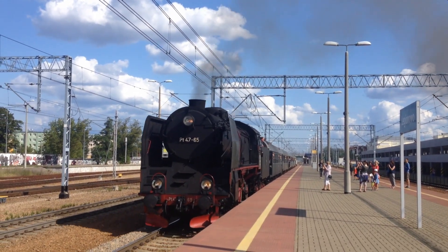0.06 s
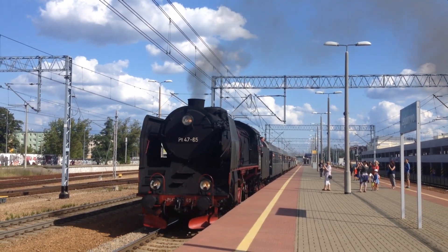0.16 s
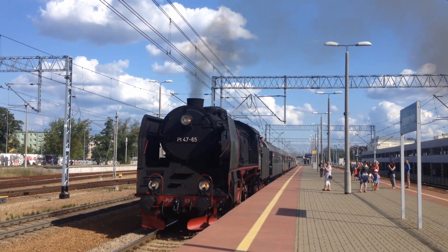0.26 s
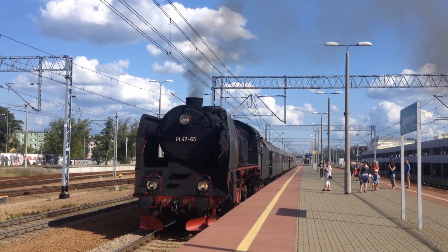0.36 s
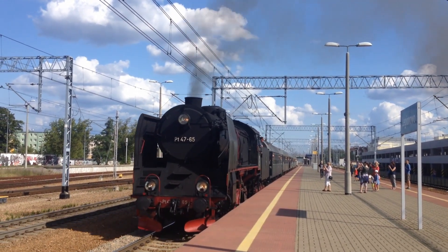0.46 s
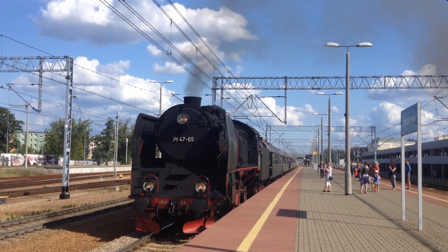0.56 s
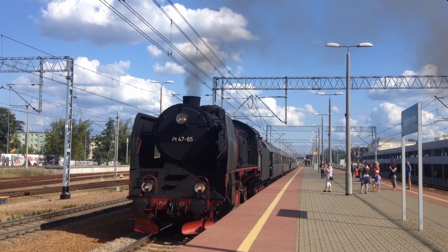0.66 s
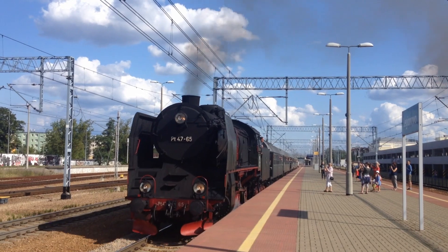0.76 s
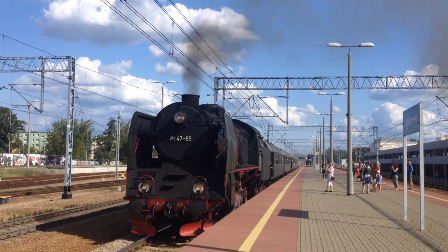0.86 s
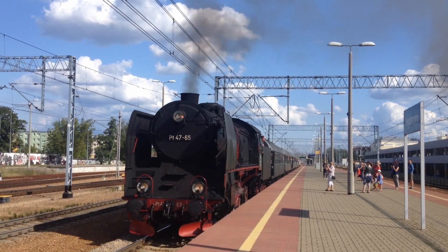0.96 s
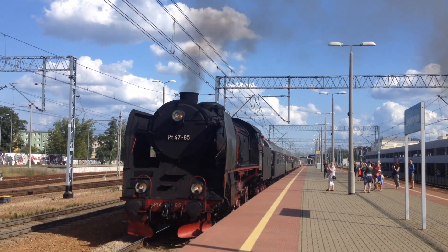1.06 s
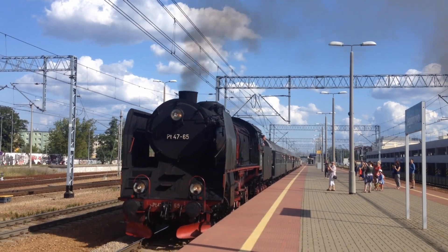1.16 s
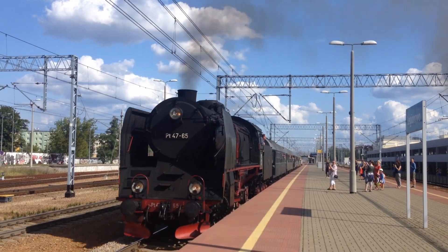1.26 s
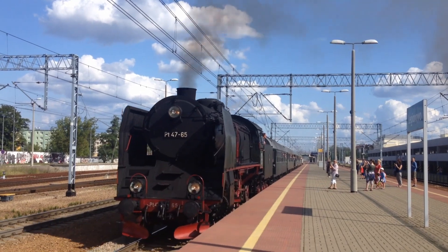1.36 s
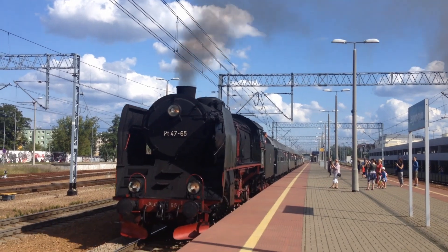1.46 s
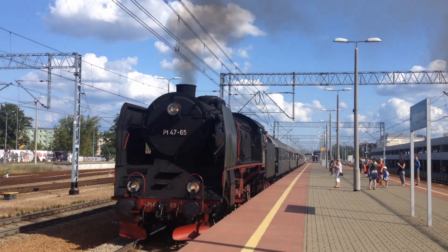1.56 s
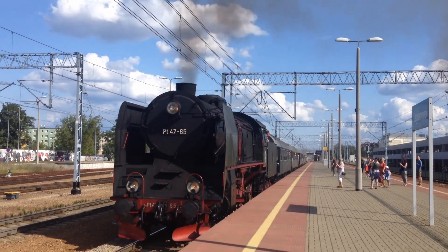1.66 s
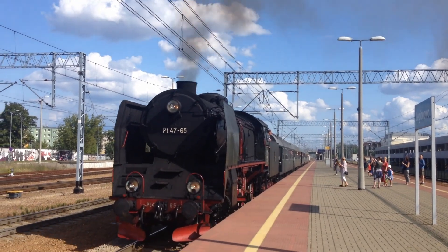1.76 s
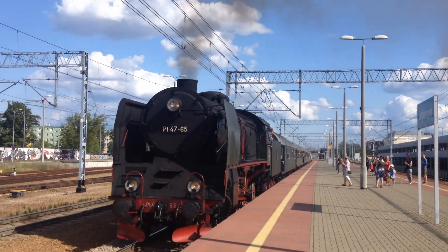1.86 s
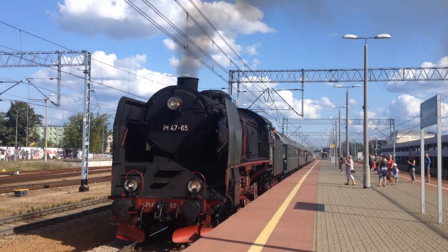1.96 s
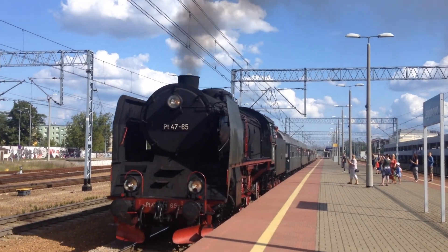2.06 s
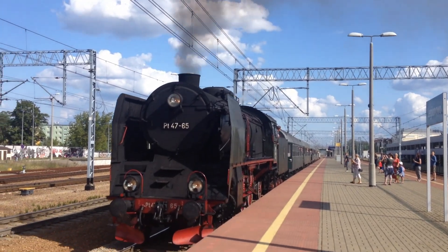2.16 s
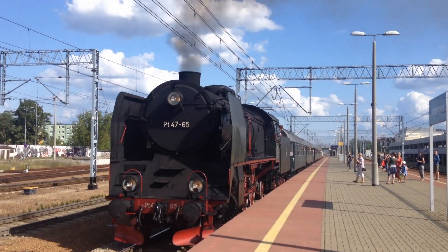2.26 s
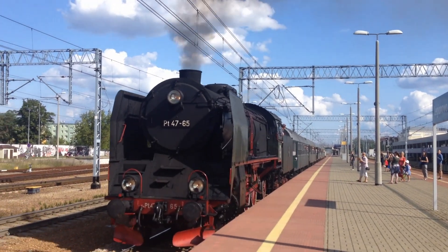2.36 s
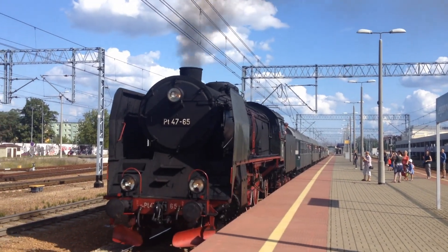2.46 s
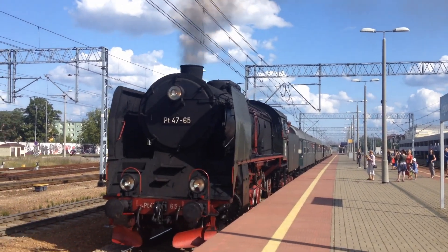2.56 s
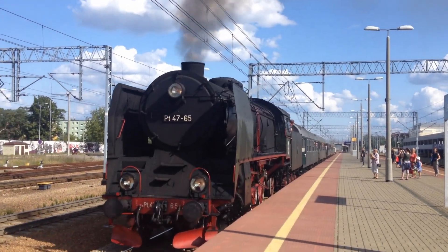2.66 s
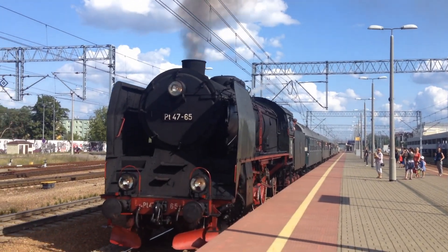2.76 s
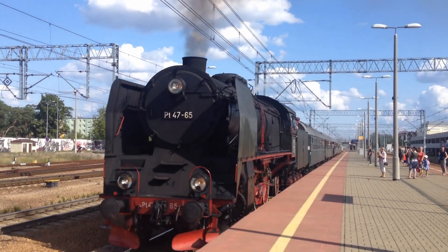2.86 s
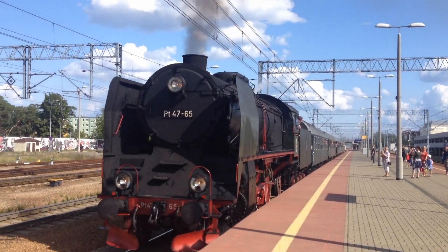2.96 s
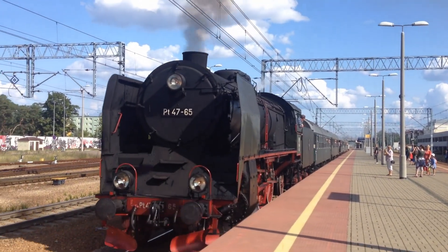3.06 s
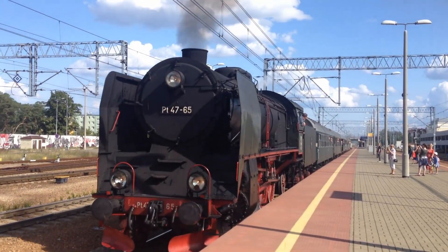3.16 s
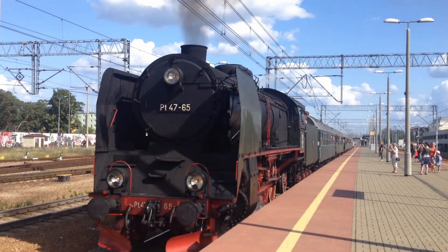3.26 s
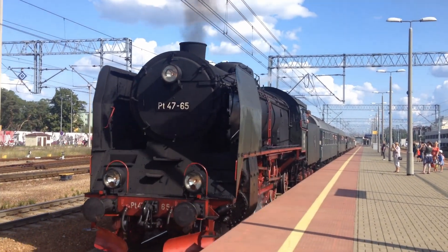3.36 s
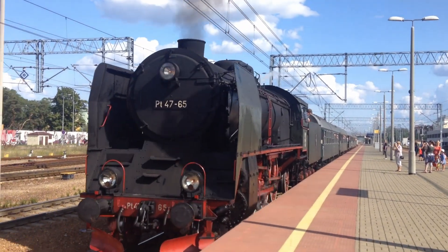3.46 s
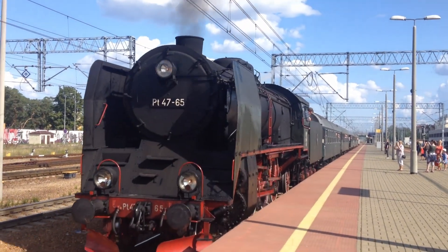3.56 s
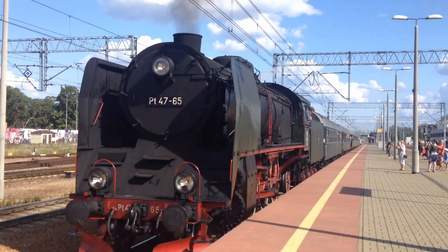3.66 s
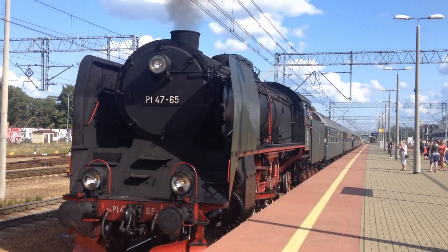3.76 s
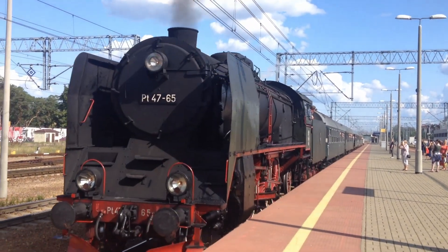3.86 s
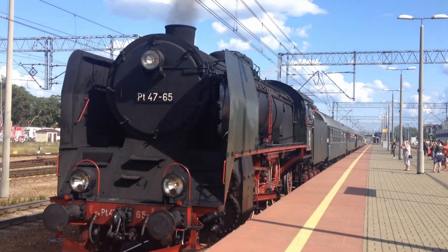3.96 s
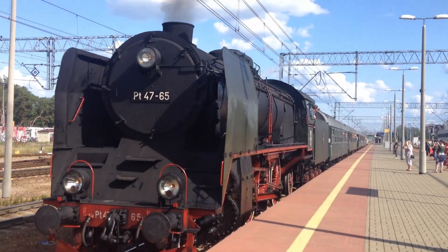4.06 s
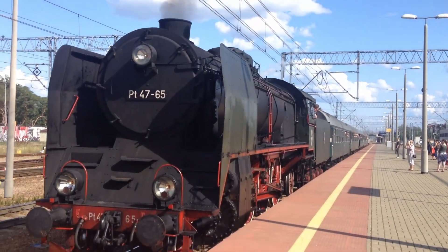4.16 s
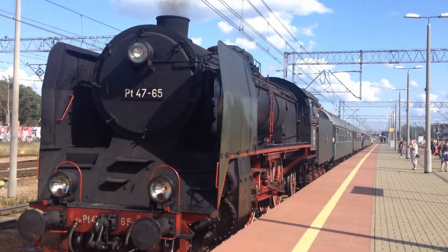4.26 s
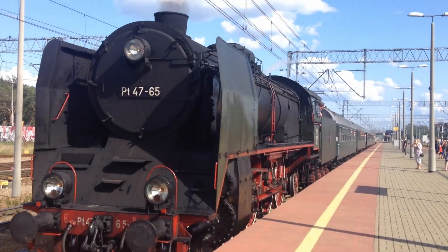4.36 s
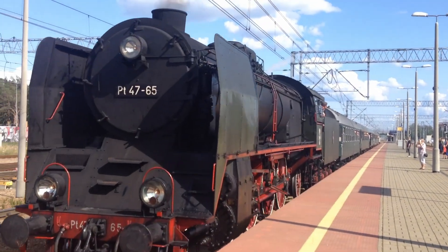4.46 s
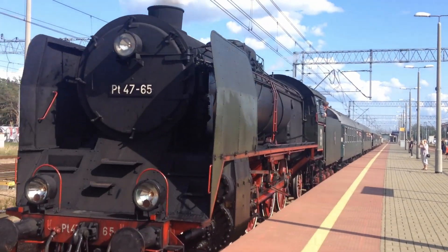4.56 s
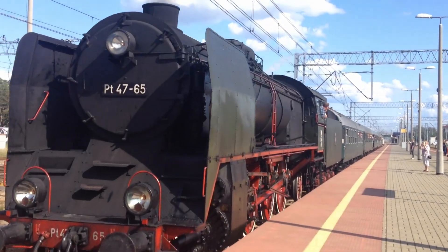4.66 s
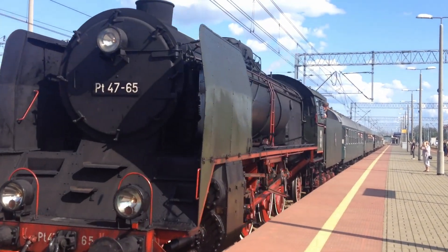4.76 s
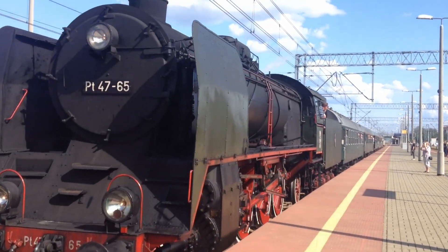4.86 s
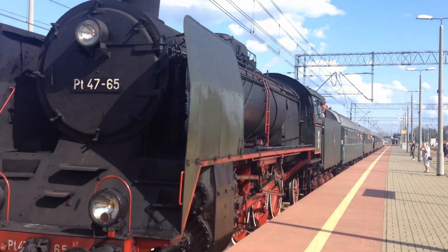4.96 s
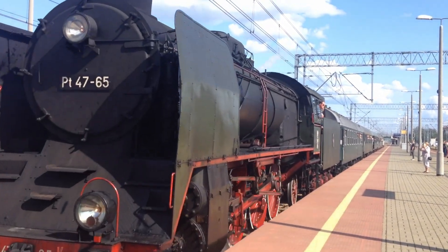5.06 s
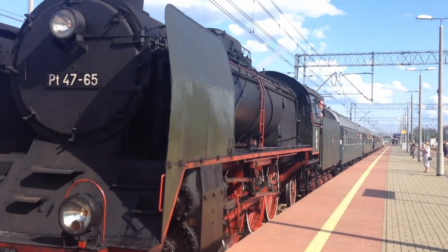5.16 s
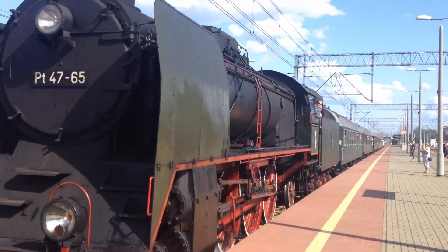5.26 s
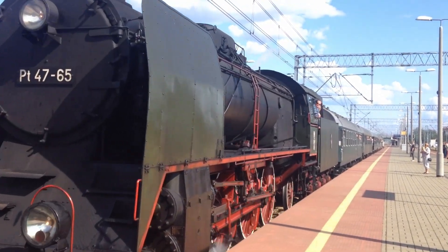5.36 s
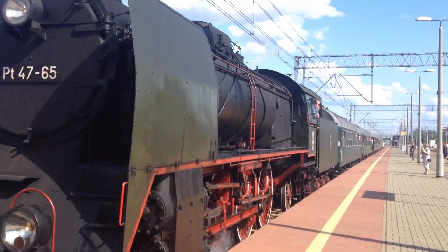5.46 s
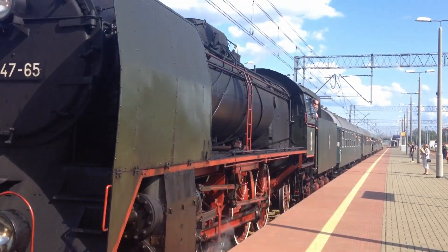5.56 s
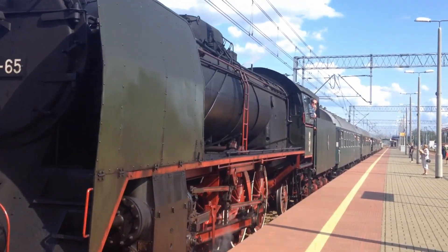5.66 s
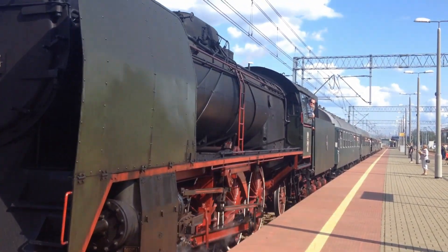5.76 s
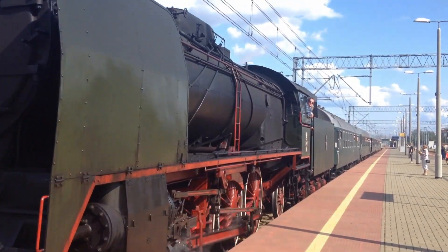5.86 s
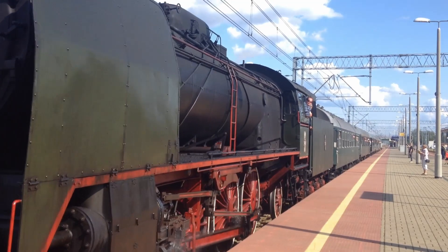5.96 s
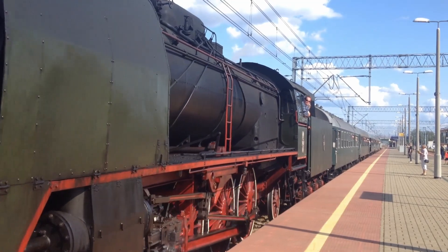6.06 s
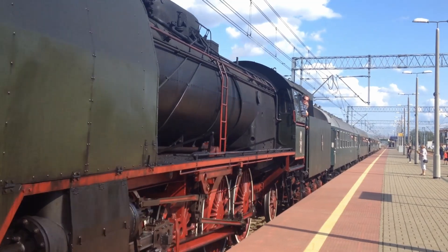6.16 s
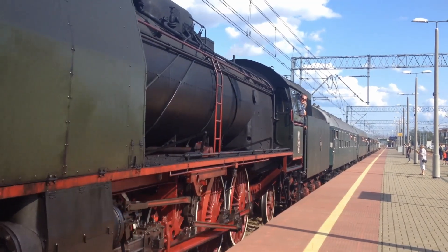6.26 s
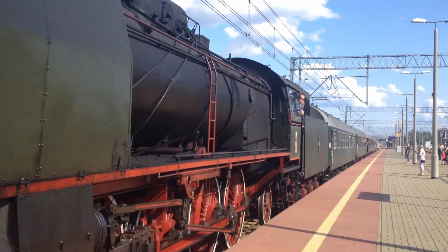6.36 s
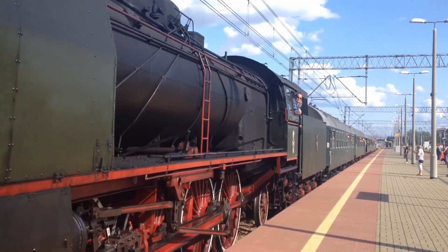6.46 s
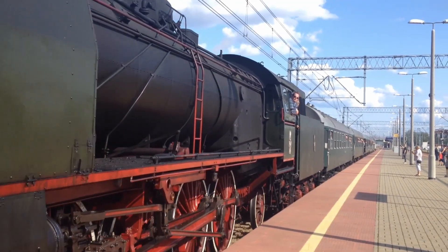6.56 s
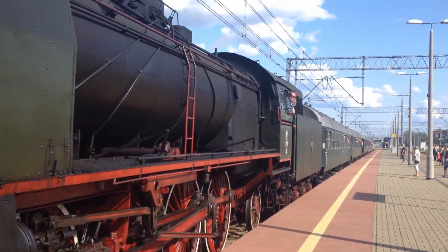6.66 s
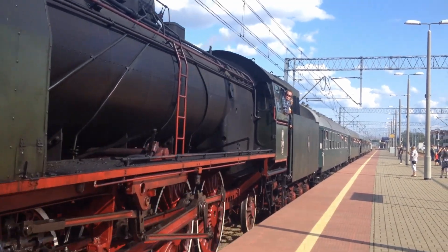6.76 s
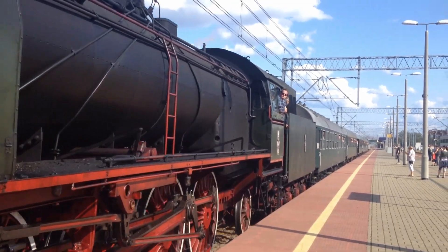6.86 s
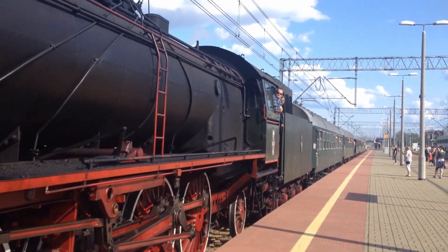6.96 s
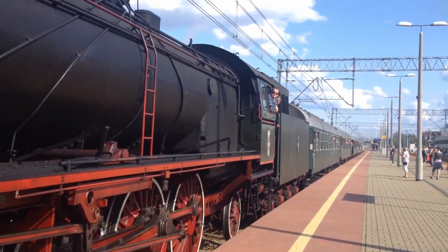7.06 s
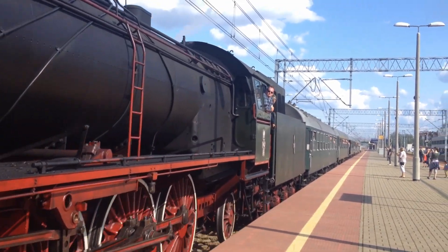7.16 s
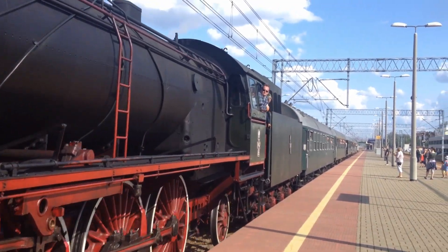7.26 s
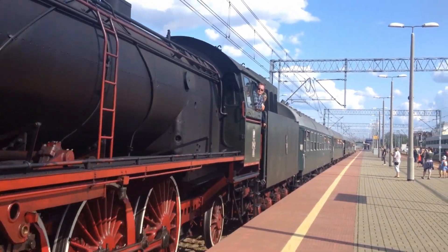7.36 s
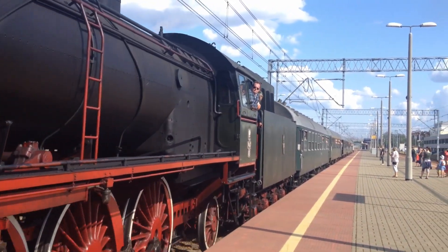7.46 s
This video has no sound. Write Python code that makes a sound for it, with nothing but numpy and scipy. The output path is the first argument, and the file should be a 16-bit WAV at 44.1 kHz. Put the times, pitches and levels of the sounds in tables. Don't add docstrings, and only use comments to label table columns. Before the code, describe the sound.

Heavy exhaust puffs of a steam locomotive start fairly distant over a steady rush of chimney draught and steam. They strengthen and boom midway, gradually speeding up, while the hiss turns louder and more sizzling. Near the end, short high steam spurts poke out beside the passing engine. Open platform with brief scattered echoes; a single live microphone heard on the left, the right silent.

```python
import sys
import numpy as np
from scipy import signal
from scipy.io import wavfile
from scipy.ndimage import uniform_filter1d

SR = 44100
rng = np.random.default_rng(int(sys.argv[2]) if len(sys.argv) > 2 else 0)


def level_to_linear(level):
    exponent = np.asarray(level, float) / 20
    return 10 ** exponent


def persist_wave(psi):
    counts = np.round(np.clip(psi, -1, 1) * 32767).astype(np.int16)
    wavfile.write(sys.argv[1], SR, np.atleast_2d(counts).T)


N = 331632
HOP = 256


def evened(x):
    return x / np.sqrt(np.mean(abs(x) ** 2) + 1e-20)


def curve(points, t):
    return np.interp(t, *np.transpose(points))


def spectrum(points, hz):
    f, value = np.transpose(points)
    return np.interp(np.log(hz + 1), np.log(f + 1), value)


def add(mix, start_s, sound):
    part = mix[round(start_s * SR):][:len(sound)]
    part += sound[:len(part)]


def air_mode(hz, width_hz, steady):
    size = len(hz) + 2000
    wander = rng.standard_normal(size) + 1j * rng.standard_normal(size)
    r = np.exp(-np.pi * width_hz / SR)
    wander = evened(signal.lfilter([1], np.convolve([1, -r], [1, -r]), wander))
    wander = wander / (abs(wander) + 0.18) ** np.clip(steady, 0, 1)
    wander = signal.lfilter([1], [1, -r ** 2], wander)[2000:]
    carrier = np.exp(2j * np.pi * np.cumsum(hz) / SR)
    return evened((wander * carrier).real)


# time in seconds, nearness from 0 (far) to 1 (alongside).
NEARNESS = [(0, -0.042), (2.5, -0.053), (4.5, 0.22), (5.8, 1.05), (7.52, 1.26)]


def steam_noise(colours, patchy_db, flicker_db):
    frames, hz = N // HOP + 5, np.fft.rfftfreq(4 * HOP, 1 / SR)
    a, b, patches = rng.standard_normal((frames, len(hz), 3)).T
    patches = uniform_filter1d(patches, size=14, axis=0)
    patches = evened(uniform_filter1d(patches, size=12, axis=1))
    flicker = evened(uniform_filter1d(rng.standard_normal(frames), size=4))
    near = curve(NEARNESS, np.arange(frames) * HOP / SR)
    far_db, near_db = (spectrum(colour, hz)[:, None] for colour in colours)
    shape = level_to_linear(far_db + near * (near_db - far_db))
    shape = shape / np.linalg.norm(shape, axis=0)
    z = (a + 1j * b) * shape * level_to_linear(patchy_db * patches + flicker_db * flicker)
    return evened(signal.istft(z, nperseg=4 * HOP, noverlap=3 * HOP)[1][:N])


def beat_db(t, length_s, lag_s, attack_s, sag_db, release_db_s):
    u = t - lag_s
    rise_db = -16 * (1 - u / attack_s)
    hold_db = sag_db * np.minimum((u - attack_s) / (length_s - attack_s), 1)
    fall_db = release_db_s * np.maximum(u - length_s, 0)
    return np.where(u < attack_s, rise_db, hold_db - fall_db)


def bumps(t, rows):
    near = [row for row in rows if t[0] < row[0] < t[-1]]
    return np.sqrt(sum(level_to_linear(db) ** 2 * np.exp(-abs((t - s) / half_s) ** 2.2) for s, half_s, db in near))


def steady_gain(source, base_db, db_per_db, lift_db):
    t = np.arange(0, N + HOP, HOP) / SR
    stoked = 0
    for start_s, length_s, *_ in BLASTS:
        stoke_db = beat_db(t - start_s, length_s, lag_s=0., attack_s=0.051, sag_db=-4, release_db_s=55)
        stoked = stoked + level_to_linear(np.maximum(stoke_db, -100))
    gain = level_to_linear(base_db + db_per_db * (curve(source, t) + 30) + lift_db * stoked)
    return np.interp(np.arange(N) / SR, t, gain)


# time in seconds, level in dB.
DRAUGHT = [(0, -38.5), (.8, -37.5), (1.3, -36), (2.3, -34.5), (2.8, -33), (3.15, -34.5), (3.6, -32),
           (4.2, -32.5), (4.7, -30), (5.3, -30.5), (5.75, -28.5), (6.05, -30.5), (6.4, -28), (6.8, -25.5),
           (6.9, -28.5), (7.1, -30.5), (7.52, -29)]
# frequency in Hz, density in dB per Hz.
ROAR = [
    [(280, -47), (480, -20), (529, -3.5), (592, -17.5), (621, -2), (791, -4), (901, -3), (1180, -4), (1560, -4.5), (1690, 1.5), (2490, -7), (2700, -12.5), (3300, -16), (4290, -46), (7260, -120)],
    [(280, -38), (480, -6), (537, -15), (701, -1.5), (760, -1), (851, -2), (953, -1), (1190, -1.5), (1500, -5.5), (1700, 0.5), (1950, 0), (2450, -7), (3300, -17.5), (4290, -56), (7260, -120)],
]
# frequency in Hz, width in Hz, level in dB re the roar.
EDGES = [
    (1723, 42, -14.5),
    (361, 60, -19.5),
]


def chimney_draught():
    roar = steam_noise(ROAR, patchy_db=1.0, flicker_db=0.46)
    edges = sum(level_to_linear(db) * air_mode(np.full(N, hz), width_hz, steady=0) for hz, width_hz, db in EDGES)
    return steady_gain(DRAUGHT, base_db=-30.5, db_per_db=1.01, lift_db=3) * (roar + edges)


# time in seconds, level in dB.
LEAK = [(0, -38), (.8, -37), (1.5, -35.5), (2.2, -33.5), (2.75, -32), (3.15, -32), (3.7, -30), (4.1, -29.5),
        (4.6, -27.5), (5.2, -27.5), (5.55, -28), (5.85, -26), (6.05, -27), (6.4, -24.5), (6.8, -21.5),
        (6.9, -25), (7.2, -24.5), (7.52, -24)]
# frequency in Hz, density in dB per Hz.
RUMBLE = [
    [(24, -88), (40, -88), (172, -1.5), (216, -12), (307, -3.5), (331, -8), (369, -6.5), (406, -8.5), (520, -22), (680, -51), (1140, -120)],
    [(24, -72), (40, -45), (102, -33), (129, -13.5), (151, 3), (301, -3), (335, -2), (369, -4.5), (520, -14), (680, -35), (1140, -120)],
]
HISS = [
    [(1820, -40), (3100, -18), (3410, -15), (4000, -5), (4860, 1.5), (7790, -13.5), (8400, -29), (10900, -29), (18500, -120)],
    [(1820, -51), (3100, -14), (3480, -13.5), (4330, -2.5), (5540, 0), (7080, -6.5), (8400, -18.5), (10900, -30), (18500, -120)],
]
FIZZ = [
    [(4820, -24), (8200, -2.5), (10400, -10.5), (12000, -6), (13100, 3), (14500, -0.5)],
    [(4820, -27), (8200, 0), (10900, -0.5), (13500, 7.5), (14500, 5.5)],
]


def cylinder_leaks():
    rumble = steam_noise(RUMBLE, patchy_db=1.54, flicker_db=0.86)
    hiss = steam_noise(HISS, patchy_db=0.9, flicker_db=0.3)
    fizz = steam_noise(FIZZ, patchy_db=0.9, flicker_db=0.27)
    rumble = rumble * steady_gain(LEAK, base_db=-41, db_per_db=1.01, lift_db=11)
    hiss = hiss * steady_gain(LEAK, base_db=-30, db_per_db=1.024, lift_db=1.34)
    fizz = fizz * steady_gain(LEAK, base_db=-37.5, db_per_db=1.2, lift_db=0.3)
    return rumble + hiss + fizz


# peak in seconds, half-width in seconds, level in dB.
THROBS = [(.28, .015, -27.5), (.36, 0.024, -29), (.925, .04, -21), (1.515, 0.014, -28), (1.575, 0.028, -22),
          (1.645, 0.024, -24.5), (2.11, 0.027, -24), (2.18, 0.027, -27), (2.74, 0.024, -23.5),
          (2.79, .03, -30), (3.27, .02, -27), (3.315, .025, -24.5), (3.42, .025, -28), (3.87, 0.029, -21.5),
          (3.94, 0.026, -26), (4.345, .02, -27), (4.39, 0.018, -28), (4.87, .025, -31), (4.945, 0.023, -24),
          (5.43, 0.054, -26), (5.86, .02, -22), (5.92, 0.018, -19), (5.985, .035, -23), (6.36, 0.043, -21),
          (6.795, 0.019, -22), (6.855, 0.028, -19.5), (6.95, .03, -27.5), (7.285, .025, -18),
          (7.335, .02, -19), (7.393, .022, -16)]


def chimney_tone(now):
    return bumps(now, THROBS) * air_mode(174.56 + 0 * now, width_hz=21.2, steady=0.97)


# peak in seconds, level in dB.
BOOM_SURGES = [(.25, -33), (.93, -29), (2.725, -30), (3.925, -20.5), (4.37, -26), (4.875, -16), (4.94, -18),
               (5.389, -13.5), (5.91, -15.5), (6.325, -20), (7.25, -24)]
# time in seconds, frequency in Hz.
BOOM_PITCH = [(0, 239.8), (2.2, 234), (3.3, 272.2), (4.4, 272.4), (4.9, 265.6), (5.4, 251.7), (5.9, 243.1),
              (7.52, 240.2)]


def smokebox_boom(now, t, length_s, db):
    beat = level_to_linear(db + beat_db(t, length_s, lag_s=-.01, attack_s=.05, sag_db=-7.5, release_db_s=250))
    surges = bumps(now, [(s, .022, surge_db) for s, surge_db in BOOM_SURGES])
    return np.hypot(beat, surges) * air_mode(curve(BOOM_PITCH, now), width_hz=61.6, steady=0.67)


# peak in seconds, level in dB.
OVERTONE_SURGES = [(2.08, -31), (2.74, -26), (3.32, -20.5), (3.855, -14), (4.305, -23), (4.93, -20.5),
                   (5.95, -23), (6.35, -22), (6.84, -22)]


def chimney_overtone(now, t, length_s, db):
    beat = level_to_linear(db + beat_db(t, length_s, lag_s=-.02, attack_s=.05, sag_db=-7, release_db_s=220))
    surges = bumps(now, [(s, 0.019, surge_db) for s, surge_db in OVERTONE_SURGES])
    sagging_hz = 386 - 45 * np.clip(t / .22, 0, 1)
    return np.hypot(beat, surges) * air_mode(sagging_hz, width_hz=87, steady=0.66)


def blast(start_s, length_s, jet_db, boom_db, overtone_db, jet):
    first = round(start_s * SR) - 2500
    now = np.arange(first, min(first + 15000, N)) / SR
    t = now - start_s
    tone = chimney_tone(now)
    overtone = chimney_overtone(now, t, length_s, overtone_db)
    boom = smokebox_boom(now, t, length_s, boom_db)
    jet_beat_db = beat_db(t, length_s, lag_s=-.01, attack_s=.06, sag_db=-4.5, release_db_s=330)
    roar = level_to_linear(jet_db + jet_beat_db) * jet[first:][:len(t)]
    puffs = evened(signal.fftconvolve(rng.standard_normal(len(t)), np.hanning(900), "same"))
    sputter = level_to_linear(0.97 * puffs)
    return now[0], (tone + sputter * (boom + overtone + roar)) * signal.windows.tukey(len(t), .1)


# start in seconds, length in seconds, then jet roar, smokebox boom
# and chimney overtone levels in dB.
BLASTS = [(.205, .165, -33, -33, -38.5), (0.854, 0.15, -30, -32.5, -35.5), (1.495, 0.2, -28, -31, -29),
          (2.055, 0.16, -30.5, -32.5, -34), (2.68, .14, -27, -33, -26), (3.225, 0.18, -22.5, -27.5, -20.5),
          (3.799, .17, -21.5, -26, -22.5), (4.28, .14, -26.5, -26.5, -23.5), (4.82, 0.15, -24, -24, -24.5),
          (5.335, .135, -23, -21.5, -28), (5.825, .19, -21.5, -20.5, -25.5), (6.275, .14, -24.5, -26, -25),
          (6.764, 0.17, -26, -26, -24.5), (7.22, 0.16, -24.5, -24.5, -25)]
# frequency in Hz, density in dB per Hz.
JET = [(310, -10), (520, -6.5), (622, -0.5), (811, -1.5), (961, -8.5), (1190, -6.5), (1580, -10),
       (1950, -12), (2400, -12.5), (2890, -25), (4000, -21.5), (5200, -35), (8800, -120)]


def exhaust_beats():
    exhaust, jet = np.zeros(N), steam_noise((JET, JET), patchy_db=1.1, flicker_db=0.96)
    for row in BLASTS:
        add(exhaust, *blast(*row, jet))
    return signal.sosfilt(signal.butter(3, 115, "high", fs=SR, output="sos"), exhaust)


# frequency in Hz, t60 in seconds.
YARD = [
    (100, 0.17),
    (400, 0.72),
    (1500, 0.32),
    (5000, 0.4),
]


def yard(x):
    taps = np.zeros(SR)
    at = np.arange(1500, SR - 20, 20)
    taps[at + rng.integers(0, 20, len(at))] = rng.choice([-1., 1.], len(at))
    hz, t, z = signal.stft(taps, SR, nperseg=512)
    decay = level_to_linear(-60 * t / spectrum(YARD, hz)[:, None])
    tail = signal.istft(z * decay, SR, nperseg=512)[1]
    return signal.fftconvolve(x, tail / np.linalg.norm(tail))[:N]


# start in seconds, length in seconds, frequency in Hz, width in Hz, level in dB.
SPURTS = [
    (6.747, 0.1, 5380, 500, -26),
    (7.388, 0.077, 5550, 120, -26),
]


def gland_spurts():
    out = np.zeros(N)
    for start_s, length_s, hz, width_hz, db in SPURTS:
        size = round(length_s * SR)
        whistle = air_mode(np.full(size, hz), width_hz, steady=0)
        add(out, start_s, level_to_linear(db) * np.hanning(size) * whistle)
    return out


def scene():
    exhaust = exhaust_beats()
    left = chimney_draught() + cylinder_leaks() + exhaust + level_to_linear(-18.5) * yard(exhaust) + gland_spurts()
    return np.array([2 * left, 0 * left])


def top_cut(x):
    return signal.sosfilt(signal.butter(12, 16570, fs=SR, output="sos"), x)


def record(dry):
    duck_from_db, duck_share, recover_db_s = -13.5, 0.27, 24
    power_db = 10 * np.log10(abs(uniform_filter1d(dry[0] ** 2, size=1300)) + 1e-12)
    fall_db = np.arange(N) * recover_db_s / SR
    held_db = np.maximum.accumulate(power_db + fall_db) - fall_db
    over_db = np.maximum(held_db - duck_from_db, 0)
    late_db = signal.lfilter([1 / 900], [1, 1 / 900 - 1], over_db)
    ducked = dry / level_to_linear(duck_share * late_db)
    bent = ducked + 0.048 * ducked * abs(ducked) ** 3 * np.sign(ducked)
    clipped = np.clip(bent, -1, 1)
    band_limit = signal.firwin(2047, 15295, window=("kaiser", 8), fs=SR)
    return top_cut(signal.oaconvolve(clipped, band_limit[None], "same"))


dry = scene()
out = record(dry)
persist_wave(out)
```